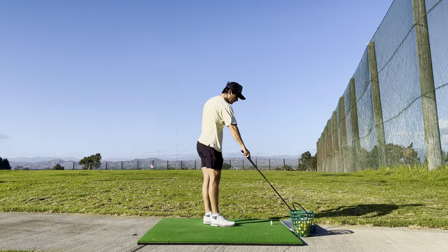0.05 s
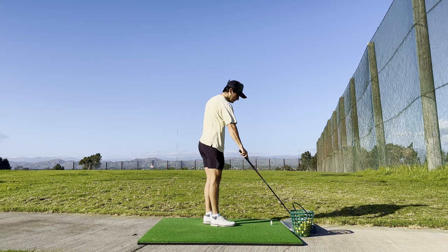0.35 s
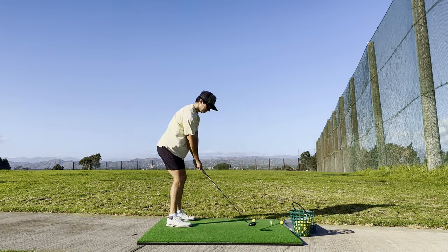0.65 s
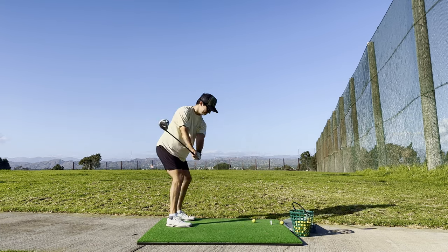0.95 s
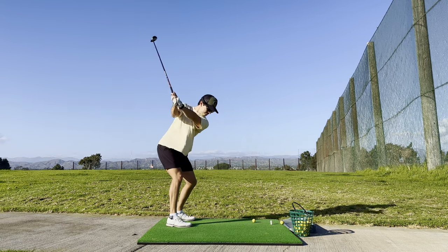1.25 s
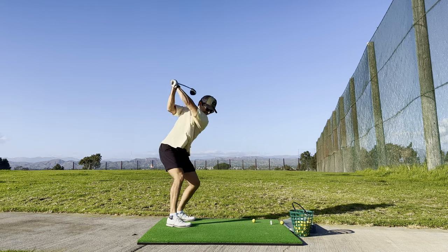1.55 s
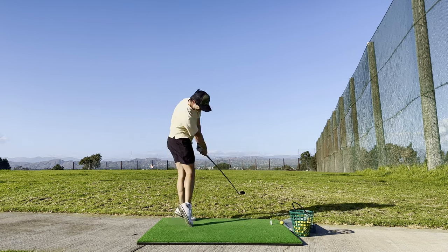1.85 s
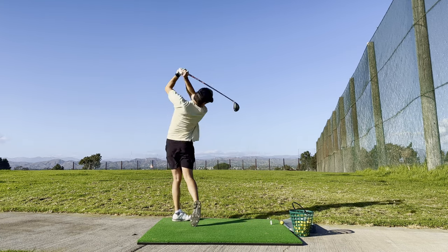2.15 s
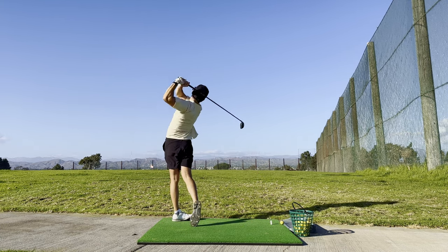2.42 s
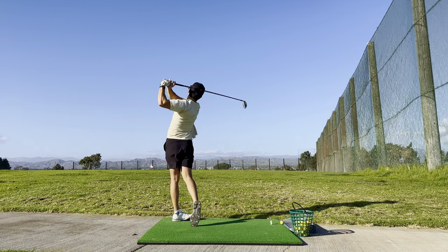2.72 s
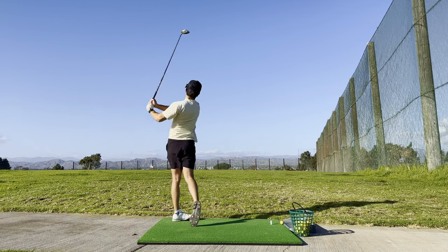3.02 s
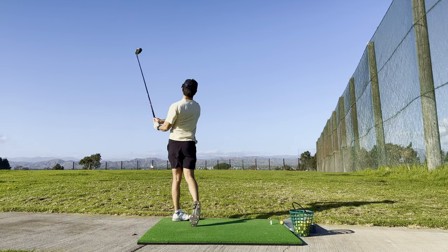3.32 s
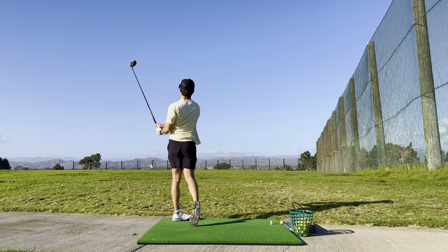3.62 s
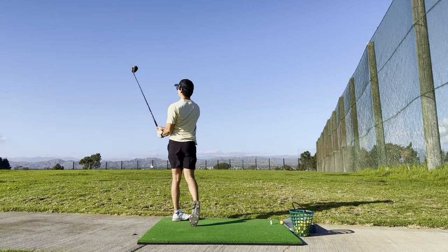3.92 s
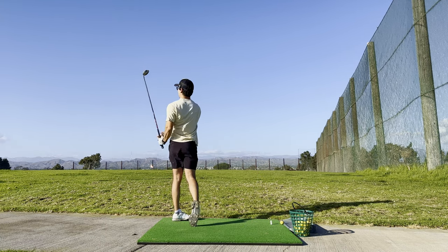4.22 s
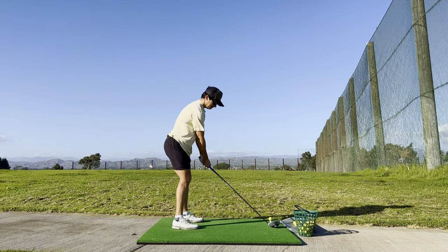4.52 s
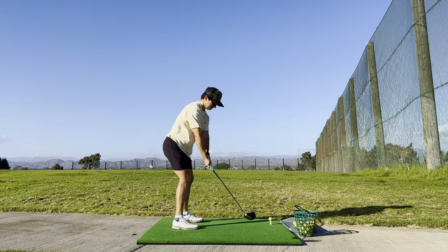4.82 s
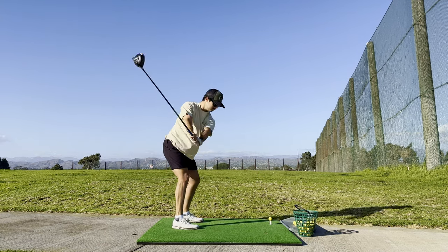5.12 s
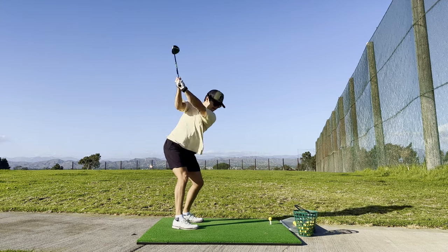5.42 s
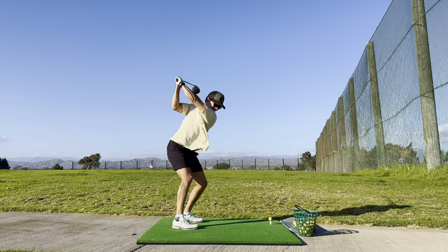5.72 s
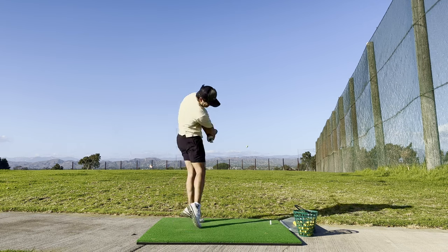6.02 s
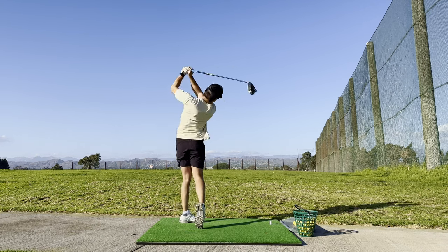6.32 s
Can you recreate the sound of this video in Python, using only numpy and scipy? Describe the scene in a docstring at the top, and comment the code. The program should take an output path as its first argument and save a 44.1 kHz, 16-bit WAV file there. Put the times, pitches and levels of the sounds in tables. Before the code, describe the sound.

A gust buffets the microphone from the start, thumping at about 0.3 seconds and easing by 1 second, over a faint, steady distant wash at an open driving range. Clothes rustle softly, then a close golf swing rises in a quick whistling whoosh and hits the ball at 1.9 seconds with a sharp metallic crack and a very short ring. Uneven gusts return from about 2.1 to 3.1 seconds. At 3.7 seconds a lighter, crisp shot comes from a neighbouring bay, followed by more wind until about 4.4 seconds. Faint thuds and scuffs of club and feet on the mat fall between 4.8 and 5.4 seconds. A second close swing whooshes into a hard, ringing crack just after 6 seconds. The tee skips away with a few tiny ticks, and a last gust bumps the microphone at around 6.3 seconds.

```python
"""An open, windy golf driving range: three shots, two close by and one from a neighbouring bay.
Each swing whistles as the shaft sheds vortices, and the head hisses through the air. The impact cracks,
excites the modes of the hollow metal head and of the ball, and is scattered back by ground and fence.
Clothes rustle, feet and clubs thud on the mat, a tee skips away. Gusts buffet the microphone over a
distant wash, and a fast limiter flattens the strikes."""
import sys
import numpy as np
from scipy import signal
from scipy.fft import rfft, irfft, next_fast_len
from scipy.io import wavfile
from scipy.ndimage import uniform_filter1d

SR = 44100
rng = np.random.default_rng(int(sys.argv[2]) if len(sys.argv) > 2 else 0)


def to_wav(s):
    """Save 16-bit WAV."""
    ch = np.atleast_2d(s).T  # columns
    pcm = np.round(np.clip(ch, -1, 1) * 32767)  # PCM
    wavfile.write(sys.argv[1], SR, pcm.astype(np.int16))


N = 284688
TIME = np.arange(N) / SR


def amp(db):
    """Amplitude ratio of a level in decibels."""
    return 10 ** (np.asarray(db) / 20)


def unit(x):
    """Normalisation to rms 1."""
    return x / np.sqrt(np.mean(x ** 2) + 1e-20)


def spectrum_db(points, hz):
    """Level at hz, interpolated over log frequency between points of frequency and level."""
    f, db = np.transpose(points)
    return np.interp(np.log(hz + 1), np.log(f + 1), db)


def noise(colour, size=N):
    """Spectral shaping: Gaussian noise of rms 1 whose relative spectrum in dB is colour(Hz)."""
    padded = next_fast_len(size, True)
    hz = np.fft.rfftfreq(padded, 1 / SR)
    return unit(irfft(rfft(rng.standard_normal(padded)) * amp(colour(hz)), padded)[:size])


def wander(hz):
    """Random modulation: noise of rms 1, low-passed at hz."""
    return noise(lambda f: -10 * np.log10(1 + (f / hz) ** 6))


def decay(t, t60):
    """Exponential damping by 60 dB in t60 seconds."""
    return np.exp(-np.log(1000) * t / t60)


def swell(s, before_s, after_s):
    """A two-sided Gaussian envelope of height 1 at s seconds."""
    return np.exp(-((TIME - s) / np.where(TIME < s, before_s, after_s)) ** 2)


def click(points, size=4096):
    """Minimum phase: the sharpest causal pulse with a given spectrum, peak 1."""
    log_gain = np.log(amp(spectrum_db(points, abs(np.fft.fftfreq(size, 1 / SR)))))
    pulse = np.fft.ifft(np.exp(np.conj(signal.hilbert(log_gain)))).real
    return pulse / abs(pulse).max()


def low_cut(x, hz):
    """A second-order high-pass filter."""
    return signal.sosfilt(signal.butter(2, hz, "highpass", fs=SR, output="sos"), x)


def add(mix, s, sound):
    """Superposition: a sound joins the mix at s seconds."""
    part = mix[round(s * SR):][:len(sound)]
    part += sound[:len(part)]


def wash(wash_db=-64, hum_hz=722, hum_width_hz=14, hum_db=-74):
    """Incoherent summation: far traffic and moving air merge into steady noise, with a wavering hum."""
    # Each row: frequency in Hz, relative level in dB.
    wash_spectrum = [(25, -27), (80, -25), (160, -39.5), (300, -15), (520, -0.5), (700, -5), (950, -2.5),
                     (1300, -9), (1950, -12.5), (3000, -17), (4750, -21), (8000, -24.5), (15500, -28)]
    hum = amp(hum_db) * unit(wander(hum_width_hz) * np.sin(2 * np.pi * hum_hz * TIME))
    return amp(wash_db) * noise(lambda f: spectrum_db(wash_spectrum, f)) + hum


def gusts(breeze_db=-70.5, breeze_db_per_octave=0.48):
    """Addition of powers: gusts over a light breeze give the wind's power and power-weighted tilt."""
    # Each row: time of full force and hold in seconds, level in dB, rise and fall in seconds,
    # spectral tilt in dB per octave.
    gust_events = [(0, .35, -39, .05, .085, 1.5), (.61, 0.086, -51.5, 0.045, 0.16, 0.5),
                   (1.06, .1, -61, 0.12, 0.068, 3), (2.12, 0.12, -58, .01, 0.038, -5.5),
                   (2.33, 0.073, -51, 0.054, 0.053, 0.5), (2.58, .1, -43.5, 0.048, 0.053, -2),
                   (2.78, .34, -55.5, .05, .05, 0), (3.838, 0.077, -42.5, 0.041, 0.2, 0.5),
                   (4.17, 0.038, -48, 0.042, 0.022, -1), (4.39, 0.024, -54.5, 0.038, 0.039, 0.5),
                   (6.0, 0.045, -48, 0.026, 0.087, 4), (6.255, 0.067, -44, 0.02, 0.013, -1.5)]
    power = amp(breeze_db) ** 2
    weighted_tilt = power * breeze_db_per_octave
    for s, hold_s, db, rise_s, fall_s, tilt in gust_events:
        rise = np.exp(-np.maximum(s - TIME, 0) / rise_s)
        fall = np.exp(-np.maximum(TIME - s - hold_s, 0) / fall_s)
        gust_power = (amp(db) * rise * fall) ** 2
        power = power + gust_power
        weighted_tilt = weighted_tilt + gust_power * tilt
    return power, weighted_tilt / power


def wind(flow_db=-2, lump_db=3, lump_hz=45, small_per_s=18, small_db=3.5, small_half_s=0.0028,
         swirl_db=-1, kick_db=3, lead_s=0.002, brighten=0.24, usual_db=-45, pivot_hz=400):
    """Turbulence buffets the microphone port: faster air makes smaller eddies and a brighter sound."""
    # The strongest eddies. Each row: time of the peak in seconds, level in dB, half length in seconds.
    strong_eddies = [(0.316, -26.5, 0.0072), (0.431, -43.5, 0.0015), (.679, -42, 0.0046),
                     (2.128, -50, 0.0086), (2.175, -45.5, 0.0073), (2.214, -46, 0.0049),
                     (2.366, -40.5, 0.0086), (2.457, -45, 0.013), (2.515, -38, 0.0048),
                     (2.559, -40, 0.0038), (2.708, -41, 0.0028), (2.751, -45, .003), (2.793, -43, 0.0047),
                     (2.849, -41, .01), (2.912, -44, 0.0069), (3.012, -45.5, 0.0025), (3.055, -37.5, 0.01),
                     (3.093, -43, 0.0046), (3.889, -37, 0.0023), (3.931, -38, 0.015), (4.024, -41, 0.0034),
                     (4.092, -42.5, 0.0089), (6.269, -36.5, .011), (6.314, -44, 0.0057)]
    # Pressure at the port. Each row: frequency in Hz, relative level in dB.
    buffet_spectrum = [(25, -28), (60, -18), (120, -5), (200, 2), (300, 4.5), (420, 1), (600, -1.5),
                       (850, -4.5), (1100, -7.5), (1400, -23.5), (1800, -34.5), (3000, -49), (8000, -72)]
    power, tilt = gusts()
    eddy_shape = np.exp(-np.linspace(-3, 3, round(6 * small_half_s * SR)) ** 2)
    small_eddies = signal.oaconvolve(1. * (rng.random(N) < small_per_s / SR), eddy_shape, "same")
    lumps = amp(flow_db + lump_db * wander(lump_hz))
    power = power * (lumps ** 2 + amp(small_db) ** 2 * small_eddies)
    kicks, kick = np.zeros(N), click(buffet_spectrum)
    for s, db, half_s in strong_eddies:  # each is a rounded pressure kick inside a short swirl
        power = power + amp(db + swirl_db) ** 2 * swell(s, half_s, half_s)
        add(kicks, max(s - lead_s, 0), rng.choice([-1, 1]) * amp(db + kick_db) * kick)
    tilt = tilt + brighten * np.maximum(10 * np.log10(power) - usual_db, -10)
    buffet = noise(lambda f: spectrum_db(buffet_spectrum, f))
    hz, frame_s, frames = signal.stft(buffet, SR, nperseg=512, noverlap=384)
    octaves = np.log2(np.clip(hz, 45, 1600) / pivot_hz)
    tilt_gain = amp(np.outer(octaves, np.interp(frame_s, TIME, tilt)))
    flow = signal.istft(frames * tilt_gain, SR, nperseg=512, noverlap=384)[1]
    return np.sqrt(power) * flow[:N] + kicks


def clothes(grain_db=1.5, grain_hz=70, ticks_per_s=35, tick_db=11, tick_t60=0.016):
    """Friction: fabric brushes in uneven strokes as the body turns, and small creases snap."""
    # Each row: time of the peak in seconds, level in dB, swell and fade in seconds.
    rustles = [(.06, -71, .15, 0.23), (1.68, -68, 0.052, 0.27), (2.1, -73.5, .15, 0.27),
               (2.95, -78, .2, 0.9), (4.15, -74.5, 1, 1), (4.21, -67.5, 0.031, 0.026),
               (5.88, -71.5, 0.12, 0.23), (6.18, -69.5, 0.23, 0.13)]
    # Each row: frequency in Hz, relative level in dB.
    cloth_spectrum = [(200, -14), (1200, 1), (2500, 1), (6500, -5.5), (10000, -16), (16000, -32)]
    strokes = sum(amp(db) * swell(s, swell_s, fade_s) for s, db, swell_s, fade_s in rustles)
    creases = rng.random(N) * (rng.random(N) < ticks_per_s / SR)
    ticks = signal.oaconvolve(creases, decay(TIME[:SR // 10], tick_t60))[:N]
    texture = amp(grain_db * wander(grain_hz)) + amp(tick_db) * ticks
    return strokes * texture * noise(lambda f: spectrum_db(cloth_spectrum, f))


def swing(s, top_hz, whistle_db, hiss_db, gather_s, kept, coast_s=.23, release_db=9.5, release_s=0.018,
          follow_db=-11.5, follow_delay_s=0.068, follow_s=0.046, core_hz=120, skirt_hz=270):
    """Vortex shedding: the shaft's pitch follows club speed; whistle and head hiss grow as its powers."""
    t = TIME - s
    speed = np.where(t < 0, np.exp(-abs(t) / gather_s), kept * np.exp(-abs(t) / coast_s))
    speed_decades = np.log10(speed)
    whip_db = release_db * swell(s, release_s, release_s / 10)  # the wrists whip the club through
    follow_through = amp(follow_db) * swell(s + follow_delay_s, follow_s, follow_s)  # the head comes round
    whistle_gain = amp(whistle_db + 46 * speed_decades + whip_db)
    hiss_gain = amp(hiss_db) * (amp(123 * speed_decades) + follow_through)
    tone = np.exp(2j * np.pi * np.cumsum(top_hz * speed) / SR)
    # Slower and faster parts of the shaft smear the tone into a band.
    core, skirt = ((tone * (wander(width) + 1j * wander(width))).real for width in (core_hz, skirt_hz))
    whistle = low_cut(whistle_gain * unit(core + amp(-2) * skirt), hz=220)
    # Each row: frequency in Hz, relative level in dB.
    hiss_spectrum = [(25, -35), (200, -3), (1000, 2), (2500, 5), (5500, 4), (9000, -5.5), (16000, -27.5)]
    return whistle + hiss_gain * noise(lambda f: spectrum_db(hiss_spectrum, f))


def knock(db, hz, octaves, t60):
    """Heavy damping: a blow on mat, tee or ball excites one broad resonance that soon dies."""
    # The faint spread round the resonance. Each row: frequency in Hz, level in dB relative to its peak.
    skirt_spectrum = [(25, -60.5), (300, -28), (4000, -46), (16000, -60)]

    def colour(f):
        resonance = np.exp(-.5 * (np.log2((f + 1) / hz) / octaves) ** 2)
        return 20 * np.log10(resonance + amp(spectrum_db(skirt_spectrum, f)))

    t = TIME[:SR // 4]
    attack = 1 - decay(t, t60 / 10)
    return amp(db) * noise(colour, len(t)) * attack * decay(t, t60)


def early_reflections(x, echo_db=-9, echo_t60=0.046, gap_s=0.0021):
    """Early reflection: mat, concrete and bay add many quick, faint copies that roughen a ring."""
    t = TIME[:SR // 10]
    taps = rng.standard_normal(len(t)) * decay(t, echo_t60) * (t > gap_s)
    return x + amp(echo_db) * signal.fftconvolve(x, taps / np.linalg.norm(taps))[:len(x)]


def strike(modes, colour, crack_db, crack_t60, snap_db, ring_db, scatter_db, scatter_t60, ball_db,
           rise_s=0.0027, scatter_rise_s=0.015):
    """Impact excitation: a snap, a dense crack, modes of head and ball, scatter from ground and fence."""
    # Colouring of the scattered crack. Each row: frequency in Hz, relative gain in dB.
    scatter_filter = [(100, -12.5), (600, -2), (2000, 3), (6500, 5), (9000, 7.5), (12000, -3), (16000, -13)]
    # The ball's dull ring. Each row: relative level in dB, centre in Hz, width in octaves, T60 in seconds.
    ball_modes = [(-5, 1184, 0.42, 0.0083), (-7, 3120, 0.27, 0.012)]
    t = TIME[:SR // 2]
    head = sum(amp(db) * decay(t, t60) * np.sqrt(2) * np.sin(2 * np.pi * (hz * t + rng.random()))
               for hz, db, t60 in modes)
    crack = noise(lambda f: spectrum_db(colour, f), len(t))
    scatter = noise(lambda f: spectrum_db(colour, f) + spectrum_db(scatter_filter, f), len(t))
    attack = 1 - np.exp(-t / rise_s)
    scatter_attack = 1 - np.exp(-t / scatter_rise_s)
    sound = amp(ring_db) * early_reflections(head * attack)
    sound += amp(crack_db) * crack * attack * decay(t, crack_t60)
    sound += amp(scatter_db) * scatter * scatter_attack * decay(t, scatter_t60)
    add(sound, 0, amp(snap_db) * click(colour))
    for db, *resonance in ball_modes:  # a ball is too small to radiate bass
        add(sound, 0, low_cut(knock(ball_db + db, *resonance), hz=590))
    return sound


def shots():
    """Modal timbre: a wood, a neighbour's club and a driver each strike with their own ring and crack."""
    # Modes of the hollow metal heads. Each row: frequency in Hz, relative level in dB, T60 in seconds.
    wood_modes = [(1690, -34, .038), (2550, -18, .015), (3220, -15, .015), (3780, -20, .04),
                  (3962, -17, .044), (4660, -32, .08), (5058, -11, .056), (5310, -30, .06),
                  (5787, -34, .08), (6065, -16, .038), (6334, -21, .04), (6525, -24, .03),
                  (7050, -22, .022), (7515, -28, .045), (9098, -16, .02), (10670, -27, .033)]
    neighbour_modes = [(2470, -21, .018), (3150, -26, .025), (4667, -40, .07), (8500, -36, .04),
                       (8780, -23, .026), (8926, -32, .038), (9130, -42, .07), (9383, -43, .07),
                       (9700, -34, .06), (9860, -38, .08), (9940, -30, .06), (10150, -33, .03)]
    driver_modes = [(1685, -33, .063), (2055, -34, .22), (2450, -23, .03), (2923, -21, .03),
                    (3031, -22, .04), (3640, -25, .04), (3786, -18, .08), (4064, -29, .05),
                    (4280, -27, .045), (4468, -28, .045), (5006, -28, .05), (5518, -38, .12),
                    (6450, -19, .042), (6650, -20, .042), (7120, -40, .14), (8102, -30, .045),
                    (8603, -34, .055), (9895, -33, .04), (10630, -32, .035)]
    # Spectra of the cracks. Each row: frequency in Hz, relative level in dB.
    wood_crack = [(25, -45.5), (300, -19), (700, -11), (1300, -9.5), (2000, -4.5), (3100, -1.5), (4300, -7),
                  (6500, 9), (9000, 1), (12500, -0.5), (16000, -15.5)]
    neighbour_crack = [(25, -53), (300, -2), (600, -1), (1300, -6), (2500, 4.5), (3200, -2), (4300, -15),
                       (7000, -5), (9800, 4), (11200, -9), (16000, -26)]
    driver_crack = [(25, -48), (300, -6), (700, 1), (1200, 1), (1500, -5), (2800, 5.5), (5000, 0),
                    (6800, 4.5), (9500, -3.5), (13500, -9), (16000, -15)]
    # Each row: start in seconds, crack level in dB and T60 in seconds, snap level in dB, ring gain in dB,
    # scatter level in dB and T60 in seconds, ball gain in dB.
    impacts = [(1.9105, -2, 0.028, -22, -3, -44.5, 0.34, 3.5),
               (3.7082, -17, 0.023, -14, -1, -34, 0.1, -21.5),
               (6.046, -2, 0.037, -20, -8, -46.5, 0.24, -5.5)]
    clubs = [(wood_modes, wood_crack), (neighbour_modes, neighbour_crack), (driver_modes, driver_crack)]
    mix = np.zeros(N)
    for (s, *impact), (modes, colour) in zip(impacts, clubs):
        add(mix, s, strike(modes, colour, *impact))
    return mix


def thuds():
    """Inelastic contact: clubs and feet thud, scuff and tap on the mat."""
    # Each row: start in seconds, level in dB, centre in Hz, width in octaves, T60 in seconds.
    blows = [(1.908, -12.5, 3650, 0.82, .03), (2.604, -55.5, 1960, 0.45, 0.22),
             (4.781, -45.5, 422, 0.87, 0.11), (5.0, -55.5, 450, 0.71, 0.081), (5.286, -50.5, 244, .35, .11),
             (5.362, -53, 390, 0.86, 0.032), (6.0649, -27.5, 527, 0.28, 0.038)]
    mix = np.zeros(N)
    for s, *blow in blows:
        add(mix, s, knock(*blow))
    return mix


def tee():
    """Rebound: a short tick echoes the neighbour's shot, then the tee skips away after the driver; each contact
    excites the same damped resonance."""
    # Each row: start in seconds, level in dB. The first is an echo of the neighbour's shot, the rest are the
    # tee's bounces.
    bounces = [(3.7275, -46), (6.0857, -34.5), (6.1025, -43), (6.108, -37), (6.123, -38), (6.17, -48.5)]
    mix = np.zeros(N)
    for s, db in bounces:
        add(mix, s, knock(db, hz=2700, octaves=1, t60=0.027))
    return mix


def scene():
    """Superposition: wash, wind and the golfers' sounds sum in one channel."""
    # Each row: time of impact in seconds, top whistle pitch in Hz, whistle and hiss gains in dB,
    # time in seconds for the speed to grow by a factor e, share of speed left after impact.
    swings = [(1.906, 946.5, -39.5, -42.5, .105, .7), (3.707, 700, -50, -65, 0.17, 0.92),
              (6.046, 900, -42, -39, .09, .71)]
    mix = wash() + wind() + clothes() + sum(swing(*row) for row in swings) + shots() + thuds() + tee()
    return mix[None]


def record(dry, low_cut_hz=60, threshold_db=-22, recover_db_per_s=900, clip_level=.36, edge_hz=15900):
    """Dynamic compression: after a wind filter, a fast limiter, soft clipping and a band limit."""
    dry = low_cut(dry, low_cut_hz)
    power_db = 10 * np.log10(abs(uniform_filter1d(dry[0] ** 2, size=90)) + 1e-12)
    recovery_db = TIME * recover_db_per_s
    held_db = np.maximum.accumulate(power_db + recovery_db) - recovery_db  # jumps up, falls steadily
    over_db = np.maximum(held_db - threshold_db, 0)
    limited = dry / amp(.85 * uniform_filter1d(over_db, size=60))
    rounded = clip_level * np.tanh(limited / clip_level)
    band_limit = signal.firwin(401, edge_hz, window=("kaiser", 7), fs=SR)
    return signal.oaconvolve(rounded, band_limit[None], "same")


dry = scene()
out = record(dry)
to_wav(out)
```